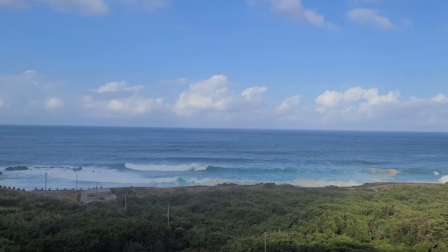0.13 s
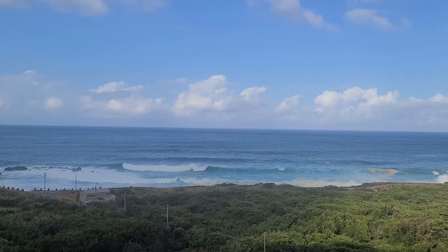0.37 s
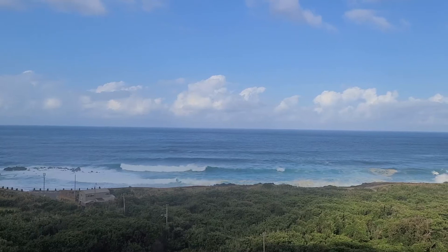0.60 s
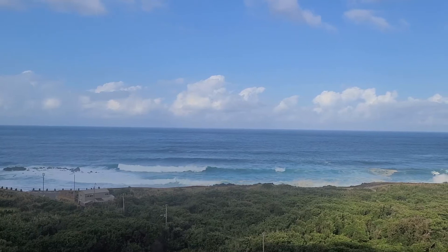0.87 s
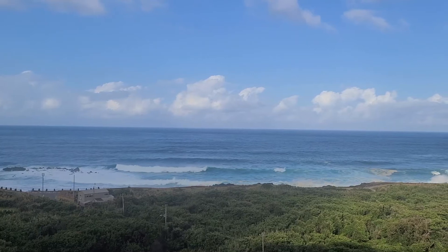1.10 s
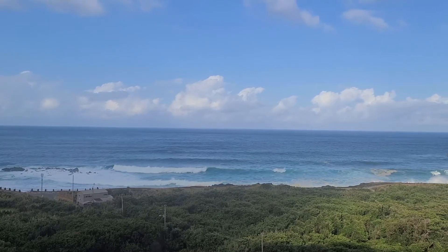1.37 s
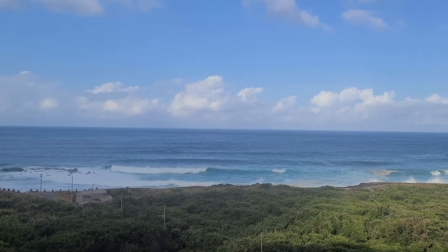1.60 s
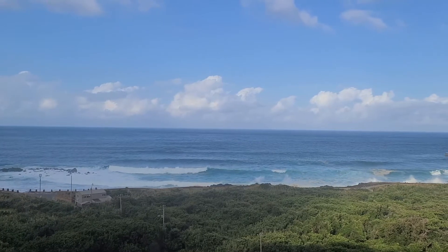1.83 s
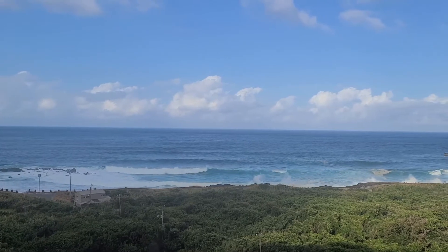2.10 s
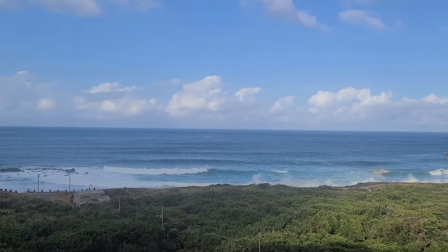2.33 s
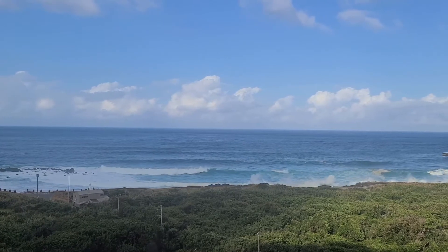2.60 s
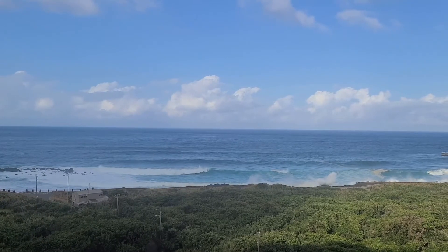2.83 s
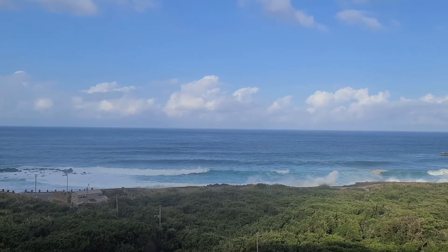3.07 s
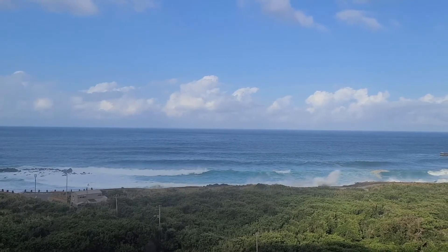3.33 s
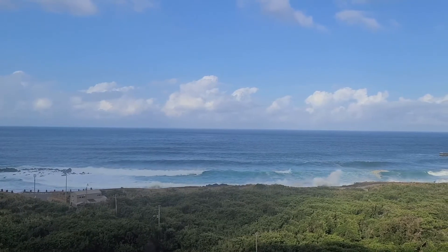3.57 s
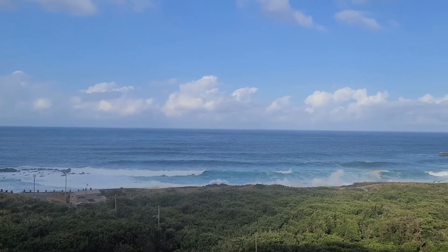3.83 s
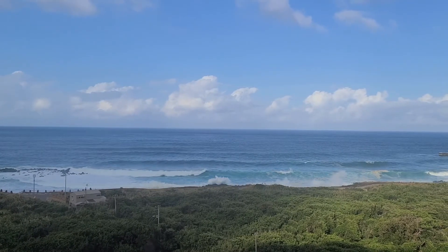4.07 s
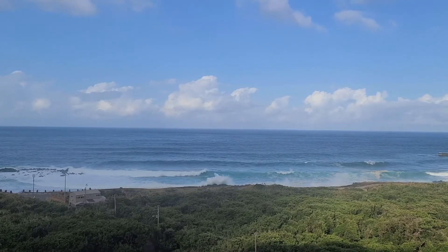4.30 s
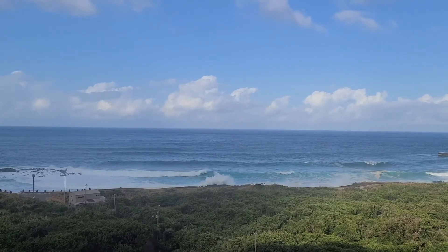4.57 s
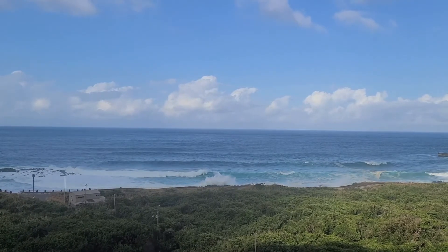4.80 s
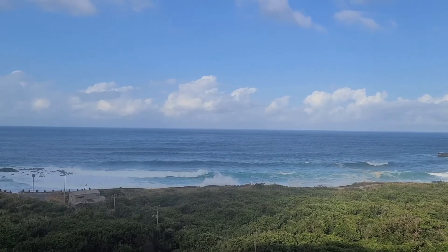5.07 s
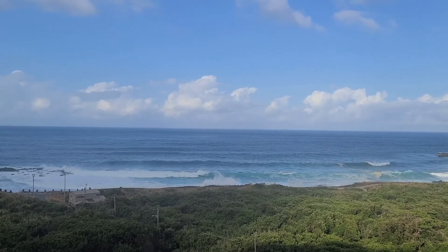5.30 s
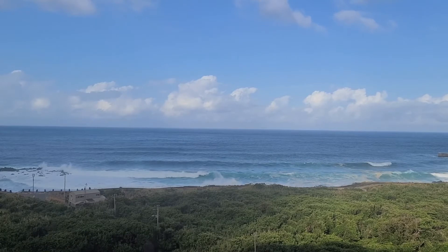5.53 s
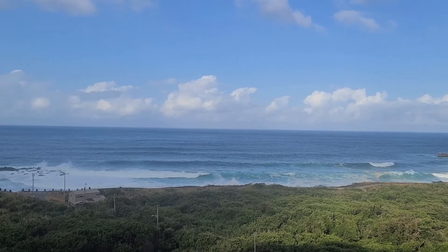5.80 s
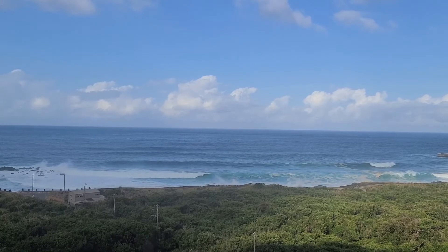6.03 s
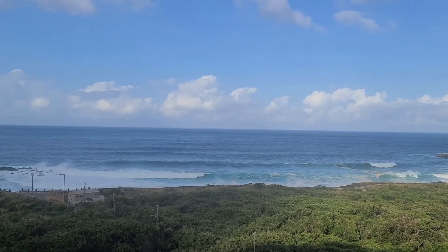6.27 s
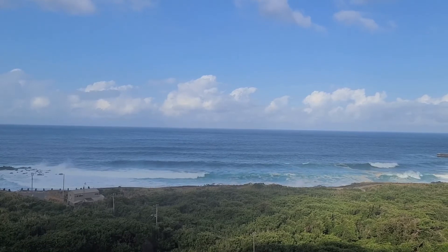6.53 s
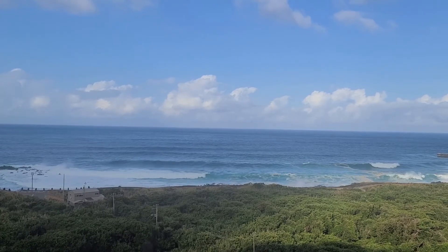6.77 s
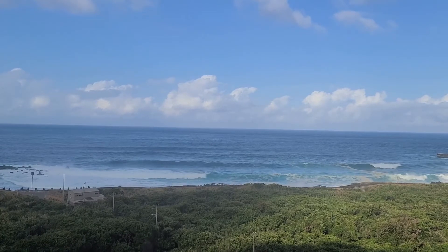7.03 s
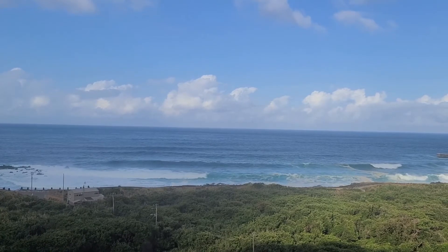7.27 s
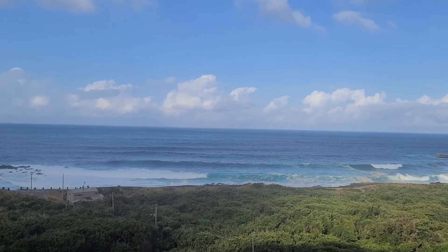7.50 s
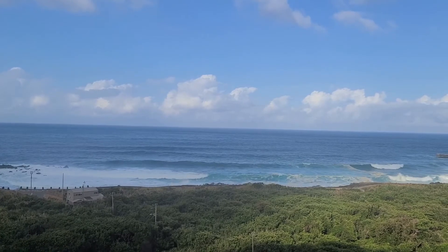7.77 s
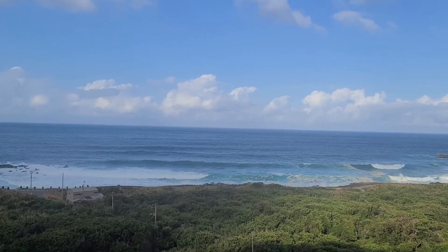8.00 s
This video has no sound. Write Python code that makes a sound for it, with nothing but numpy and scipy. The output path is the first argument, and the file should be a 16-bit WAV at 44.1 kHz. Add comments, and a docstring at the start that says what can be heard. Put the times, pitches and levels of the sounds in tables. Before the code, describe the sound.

Heavy surf rushes steadily with a low rumble on a rocky coast while a vehicle accelerates up, passes right to left and recedes.

```python
"""Surf and a passing vehicle

Heavy surf on a rocky coast, heard from a far hill: coloured noise makes a low rumble and a wide rush.
Bursts of noise are spray from the near rocks; decaying low tones are thumps of wind on the microphones.
A vehicle speeds up on the road nearby and passes from right to left: two engine tones, tyre roar and hiss.
Two spaced microphone ports hear it after a short silence. The recorder drops a moment of sound,
heard as a phase jump in the engine tones."""
import sys
import numpy as np
from scipy import signal
from scipy.fft import rfft, irfft, next_fast_len
from scipy.io import wavfile
from scipy.ndimage import uniform_filter1d, map_coordinates

SR = 44100
rng = np.random.default_rng(int(sys.argv[2]) if len(sys.argv) > 2 else 0)


def generate_wav(signal):
    """Clip the signal to [-1, 1] and save it as 16-bit WAV at the path in sys.argv[1]."""
    frames = np.transpose(np.atleast_2d(signal))
    scaled = np.clip(frames, -1, 1) * 32767
    pcm = np.round(scaled).astype(np.int16)
    wavfile.write(sys.argv[1], SR, pcm)


def natural_amplitude(level_db):
    """Convert a level in decibels to a linear amplitude factor, elementwise."""
    exponent = np.asarray(level_db, float) / 20
    return 10 ** exponent


N = 358533

# Every spectrum below gives only the colour; the noise is then scaled to rms 1.
# engine speeding up, then climbing slowly: time_s, firing_hz
REVS = [(1.9, 16), (2.9, 35), (3.75, 59.4), (3.95, 62.2), (5.4, 65.6), (6.5, 67.6), (8.13, 69.8)]
# engine strength: time_s, drone_db, octave_db
ENGINE = [(2.9, -56, -48), (3.22, -52, -32.5), (3.5, -37, -29), (3.9, -30.5, -36), (4.2, -30, -34),
          (4.55, -17.5, -39.5), (4.9, -18, -31.5), (5.2, -15, -37), (5.45, -17, -39), (5.65, -24, -46),
          (6.05, -27.5, -41), (6.2, -32.5, -34), (6.5, -26.5, -41), (6.95, -35, -39), (7.25, -43, -50),
          (7.6, -30.5, -51), (7.8, -48, -49), (8.13, -29, -52)]
# direction of the vehicle: time_s, left_port_lag_ms
BEARING = [(2.5, 0.33), (3.3, 0.3), (4.15, .19), (4.4, .0), (4.6, -0.3), (5.0, -0.43), (5.4, -0.52),
           (6, -0.51), (8.13, -0.57)]
# colour of the tyre roar: pitch_hz, level_db (per Hz)
ROAR_SPECTRUM = [(200, -32), (600, -3.5), (1000, 4.5), (1400, 3.5), (1900, -0.5), (2500, -5), (3000, -7.5),
                 (3700, -27), (5000, -17.5), (8000, -51)]
# colour of the tyre hiss: pitch_hz, level_db (per Hz)
HISS_SPECTRUM = [(2350, -17.5), (4000, 1), (5100, -7.5), (6500, -8.5), (7200, -11.5), (8200, -9),
                 (9500, -16.5), (11400, -19.5), (13000, -22), (15600, -29)]
# colour of the exhaust: pitch_hz, level_db (per Hz)
EXHAUST_SPECTRUM = [(100, -16), (200, -2), (320, 0), (550, -4), (800, -14.5), (1200, -8.5), (1700, -20),
                    (2500, -19), (4000, -55)]
# duller, hollower colour of the rear tyres: pitch_hz, level_db (per Hz)
REAR_SPECTRUM = [(300, -30), (800, -7), (1250, 2.5), (1750, 1), (2300, -7.5), (2900, -19.5), (5000, -42.5)]
# how each noise of the vehicle drives past: nearest_s, near_s (time to drive the nearest distance),
# near_db (before the later mixing), speed_db (per tenfold firing rate), air_db (loss per s of driving)
ROAR_PASS = (3.5, 2, -32.5, 27.5, -0.26)
HISS_PASS = (4.5, .9, -47, 45, 4)
TAIL_PASS = (5.5, 0.97, -32.5, 20, 0.4)
REAR_PASS = (5.22, 0.3, -35, 32, 3)
# in clear view through a gap in the bushes: start_s, end_s, edge_s
GAP = (4.52, 5.42, 0.055)
# hidden behind a bush: start_s, end_s, edge_s
BUSH = (4.02, 4.41, .1)
# bursts of spray on the near rocks: peak_s, level_db, rise_s (for 12 dB), fall_s (for 60 dB)
SPLASH = [(.377, -28, .003, 0.04), (.398, -31, .005, 0.038), (.46, -30, 0.11, 0.66),
          (.86, -32.5, 0.051, 0.42), (1.03, -38.5, 0.056, 0.66)]
# colour of the spray: pitch_hz, level_db (per Hz)
SPRAY_SPECTRUM = [(300, -10), (600, 3), (900, -4), (1400, 5.5), (2400, 0.5), (3300, -4), (4400, -7),
                  (5200, -17), (6200, -20), (8000, -39), (12000, -62)]
# thumps of wind on the microphones: start_s, level_db (before the soft onset), pitch_hz, fall_s (for 60 dB)
THUMP = [(0.465, -9, 87.3, 0.2), (1.312, -9, 89, 0.048), (1.357, -15.5, 67, 0.18), (4.654, -15, 65, .12),
         (4.99, -2.5, 67.4, 0.09)]
# swell and ebb of the breakers: time_s, rumble_db, rush_db
SURF_LEVELS = [(0, -32, -28.5), (1.5, -32, -29), (3.2, -32.5, -30), (5, -32.5, -29.5), (6.8, -29, -29.5),
               (8.13, -35, -31.5)]
# colour of the rumble: pitch_hz, level_db (per Hz)
RUMBLE_SPECTRUM = [(12, -40), (20, -5), (61, 8), (124, -8.5), (140, -24), (162, -8), (200, -5), (260, -39),
                   (440, -120)]
# colour of the rush: pitch_hz, level_db (per Hz)
RUSH_SPECTRUM = [(60, -15.5), (100, 4), (150, -5), (300, -5), (620, -8), (800, -13.5), (1400, -13),
                 (2300, -19), (3000, -24.5), (4000, -27.5), (5200, -36.5), (6300, -38), (7500, -49),
                 (9500, -58.5), (12000, -75), (15600, -70)]
# how alike the rush is at the two ports: pitch_hz, likeness (0 to 1)
ALIKE = [(60, 1), (200, 1), (600, 0.75), (1000, 0.62), (2500, 0.31), (4000, 0.18), (5000, 0.14),
         (15000, .15)]
# phase of the sea sound between the ports: pitch_hz, left_lead_radians
LEAD = [(20, -1), (600, 0.19), (900, 0.17), (1200, 2), (1400, 1.66), (1700, 2), (2300, 1), (2700, 2.5),
        (3100, 5.5), (3600, 6.5), (4000, 7), (5000, 9), (6000, 11), (9000, 14.5)]
# difference in colour of the ports: pitch_hz, left_minus_right_db
LEAN = [(60, -0.5), (99, -2), (160, 1), (270, -1), (450, 0), (740, -1.5), (1220, -2.5), (2010, -3.5),
        (3330, -1.0), (5500, -3.5), (9080, 0), (15000, -2)]


def vehicle():
    """Two engine tones locked to the firing rate, with tyre and exhaust noise, from a moving direction."""
    t = np.arange(N) / SR
    firing_hz, = curves(REVS)
    moving = t > REVS[0][0]
    # half the lag in seconds: plus for the left port, minus for the right
    half_lag = curves(BEARING)[0] / 2000 * np.array([[1], [-1]])
    engine = engine_tones(firing_hz, half_lag)

    roar_gain = moving * passing(firing_hz, ROAR_PASS, gap_db=3, bush_db=-2.5) * natural_amplitude(0.21 * wobble(5.5))
    hiss_gain = moving * passing(firing_hz, HISS_PASS, gap_db=2, bush_db=-4.5) * natural_amplitude(0.39 * wobble(9.7))
    roars = noise(ROAR_SPECTRUM, patchy_db=1.2, channels=3)
    hisses = noise(HISS_SPECTRUM, patchy_db=0.8, channels=3)
    direct = roar_gain * roars[0] + 0.56 * hiss_gain * hisses[0]
    # scattered off the slope and bushes, the noise reaches each port on its own
    scattered = 0.2 * roar_gain * roars[1:] + 0.8 * hiss_gain * hisses[1:]

    # exhaust and rear tyres swing past a little after the front wheels
    tail_lag = np.array([np.interp(t - 0.22, t, lag) for lag in half_lag])
    tail_gain = moving * passing(firing_hz, TAIL_PASS, gap_db=2.5, bush_db=0)
    tail = tail_gain * noise(EXHAUST_SPECTRUM, patchy_db=1.5, channels=1)[0]
    rear_gain = moving * passing(firing_hz, REAR_PASS, gap_db=5.5, bush_db=0)
    rear = rear_gain * noise(REAR_SPECTRUM, patchy_db=0.8, channels=1)[0]

    ports = heard(direct, half_lag) + heard(tail + rear, tail_lag)
    # the engine is a little weaker at the left port; the root of 2 brings a tone to its rms level
    return np.sqrt(2) * moving * engine * natural_amplitude([[-0.4], [0.4]]) + ports + scattered


def engine_tones(firing_hz, half_lag):
    """The drone repeats once per firing and its octave twice; adding up the rate gives the phase."""
    drop_s = 5.4233
    drone_db, octave_db = curves(ENGINE)
    turns = np.cumsum(firing_hz * (1 + 0.002 * wobble(9.5))) / SR
    # the recorder drops a moment of sound, heard as a phase jump of 0.45 cycle in the drone
    turns += 0.33 - turns[round(drop_s * SR)] + 0.45 * (np.arange(N) / SR > drop_s)
    turns = turns - firing_hz * half_lag
    drone = natural_amplitude(drone_db + 0.35 * wobble(7.0)) * np.cos(2 * np.pi * turns)
    octave = natural_amplitude(octave_db) * np.cos(4 * np.pi * turns + 1)
    return drone + octave


def passing(firing_hz, path, gap_db, bush_db):
    """Gain of a source driving past: engine speed, distance, air loss, a bush in the way and a clear gap."""
    nearest_s, near_s, near_db, speed_db, air_db = path
    cruise_hz = 65
    t = np.arange(N) / SR
    far = np.hypot(t - nearest_s, near_s)  # distance, as driving time in seconds
    within = lambda a, b, edge: (np.tanh((t - a) / edge) - np.tanh((t - b) / edge)) / 2
    view_db = gap_db * within(*GAP) + bush_db * within(*BUSH)
    speed_gain_db = speed_db * np.log10(firing_hz / cruise_hz)
    air_loss_db = air_db * (far - near_s)
    return natural_amplitude(near_db + speed_gain_db - air_loss_db + view_db) * near_s / far


def heard(source, half_lag):
    """One source reaches the two ports at different times, half the lag on each side."""
    return np.array([map_coordinates(source, [np.arange(N) - lag * SR], order=3, mode="nearest")
                     for lag in half_lag])


def splashes():
    """Spray from the near rocks: bursts of coloured noise that rise fast and fade."""
    t = np.arange(N) / SR
    burst = np.zeros(N)
    for peak_s, level_db, rise_s, fall_s in SPLASH:
        slope_db = np.where(t < peak_s, (t - peak_s) * 12 / rise_s, (peak_s - t) * 60 / fall_s)
        burst += natural_amplitude(level_db + slope_db)
    spray = noise(SPRAY_SPECTRUM, patchy_db=0.7, channels=2)
    return wall(burst * wide(spray, [(1000, 1.0)], LEAD))


def wind_thumps():
    """Wind buffets the microphones: decaying low tones with a soft onset, the same at both ports."""
    thump = np.zeros(N)
    u = np.arange(SR // 2) / SR  # seconds since the thump began
    for start_s, level_db, pitch_hz, fall_s in THUMP:
        envelope = natural_amplitude(level_db - 60 * u / fall_s) * (1 - np.exp(-u / 0.0052))
        thump[round(start_s * SR):][:len(u)] -= envelope * np.sin(2 * np.pi * pitch_hz * u)
    return thump


def surf():
    """The far breakers blend into noise: a rumble in lumps under a smooth wide rush."""
    rumble_db, rush_db = curves(SURF_LEVELS)
    lumps = wide(noise(RUMBLE_SPECTRUM, patchy_db=1.5, channels=2), [(60, 0.62)], LEAD)
    # a slow random swell plus a quicker one
    rumble = natural_amplitude(rumble_db + 0.9 * wobble(3.01) + 1.65 * wobble(9)) * lumps
    smooth = wide(noise(RUSH_SPECTRUM, patchy_db=0.57, channels=2), ALIKE, LEAD)
    rush = natural_amplitude(rush_db + 0.81 * wobble(4.5)) * smooth
    return rumble + wall(rush)


def wall(x):
    """A surface close by sends back a short echo that ripples the middle range."""
    echo_s = 0.002457
    strength = lambda hz: along([(300, 0), (700, 0.22), (2500, 0.12), (5000, 0.065)], hz)
    return filtered(x, lambda hz: 1 - strength(hz) * np.exp(-2j * np.pi * hz * echo_s))


def wide(pair, alike, lead):
    """Two noises mixed to a left-right likeness, the left port leading in phase."""
    turn = lambda hz: np.arccos(np.clip(along(alike, hz), 0, 0.95)) / 2
    mid, side = filtered(pair, lambda hz: np.array([np.cos(turn(hz)), np.sin(turn(hz))]))
    shift = lambda hz: np.exp(0.5j * along(lead, hz) * np.array([[1], [-1]]))
    return filtered(np.array([mid + side, mid - side]), shift)


def noise(spectrum, patchy_db, channels):
    """Coloured noises, together of rms 1, that share patches of random gain in time and pitch."""
    z = signal.stft(rng.standard_normal((channels, N)), nperseg=512)[2]
    field = uniform_filter1d(rng.standard_normal(z.shape[1:]), size=6, axis=0)
    field = uniform_filter1d(field, size=12, axis=1)
    patchy = signal.istft(z * natural_amplitude(patchy_db * unit(field)), nperseg=512)[1][:, :N]
    return unit(filtered(patchy, lambda hz: natural_amplitude(along(spectrum, hz))))


def filtered(x, response):
    """Filters x by multiplying its spectrum by a complex response of frequency."""
    m = next_fast_len(N + 8192)
    return irfft(rfft(x, m) * response(np.fft.rfftfreq(m, 1 / SR)), m)[..., :N]


def wobble(rate):
    """A smooth random curve through rate random points a second, at most 40."""
    points = rng.standard_normal(int(N * 40 / SR) + 4)
    return map_coordinates(points, [np.arange(N) * min(rate, 40) / SR])


def curves(rows):
    """One value per sample for each column after the time."""
    s, *columns = np.transpose(rows)
    return [np.interp(np.arange(N) / SR, s, column) for column in columns]


def along(points, hz):
    """Reads a curve of (pitch_hz, value) points on a log pitch axis."""
    f, v = np.transpose(points)
    return np.interp(np.log(hz + 1), np.log(f + 1), v)


def unit(x):
    """Scaled to rms 1."""
    return x / np.sqrt(np.mean(x ** 2) + 1e-20)


def scene():
    """Surf, splashes, wind thumps and the passing vehicle."""
    return surf() + splashes() + wind_thumps() + vehicle()


def low_pass(x):
    """Removes everything above the highest recorded frequency."""
    return signal.sosfilt(signal.butter(12, 15750, fs=SR, output="sos"), x)


def record(dry):
    """The ports differ a little in colour and hiss faintly; silence comes before the start."""
    start_s, fade_in_s = 0.0825, 0.0018
    ports = filtered(dry, lambda hz: natural_amplitude(along(LEAN, hz) * np.array([[0.5], [-0.5]])))
    ports = ports + natural_amplitude(-79) * rng.standard_normal((2, N))
    fade = np.clip((np.arange(N) / SR - start_s) / fade_in_s, 0, 1)
    return low_pass(ports * fade)


dry = scene()
out = record(dry)
generate_wav(out)
```